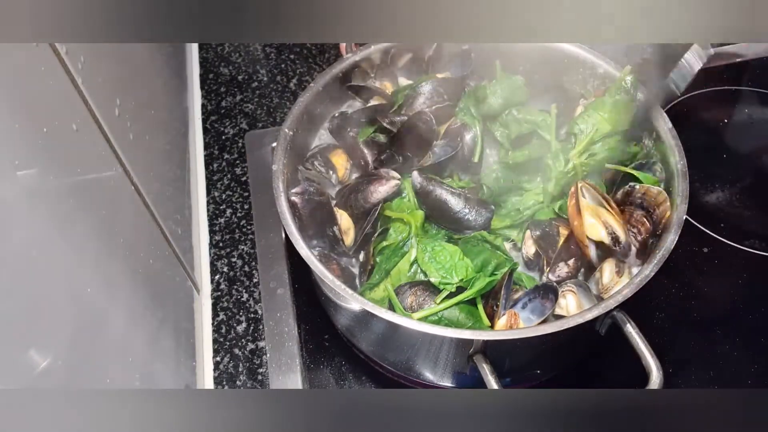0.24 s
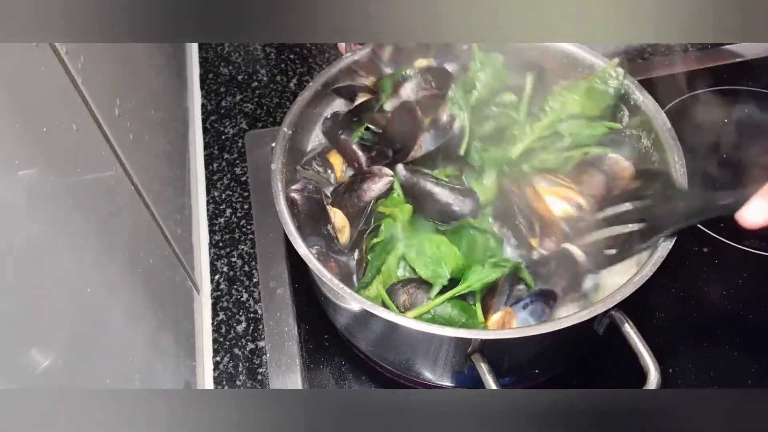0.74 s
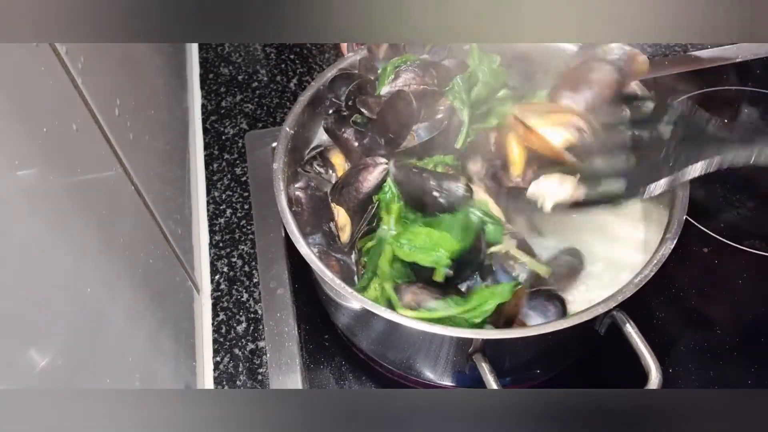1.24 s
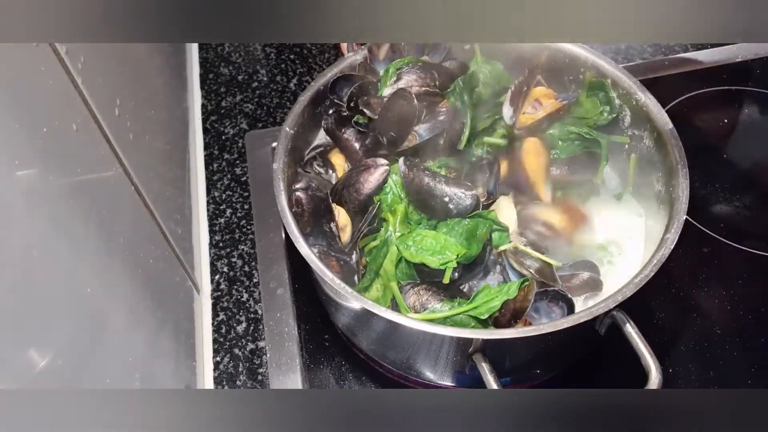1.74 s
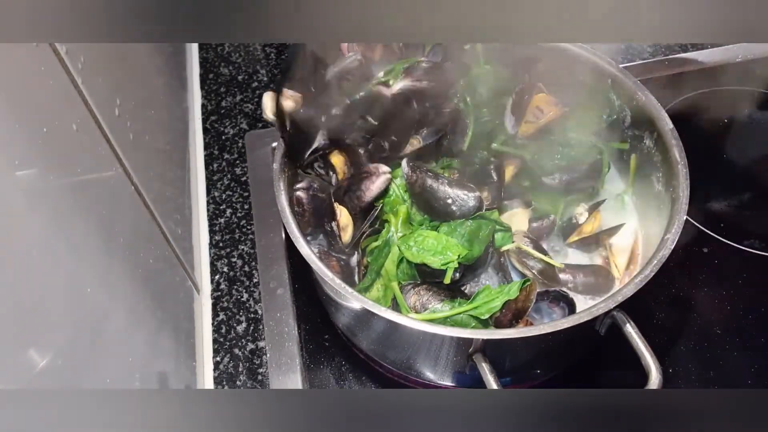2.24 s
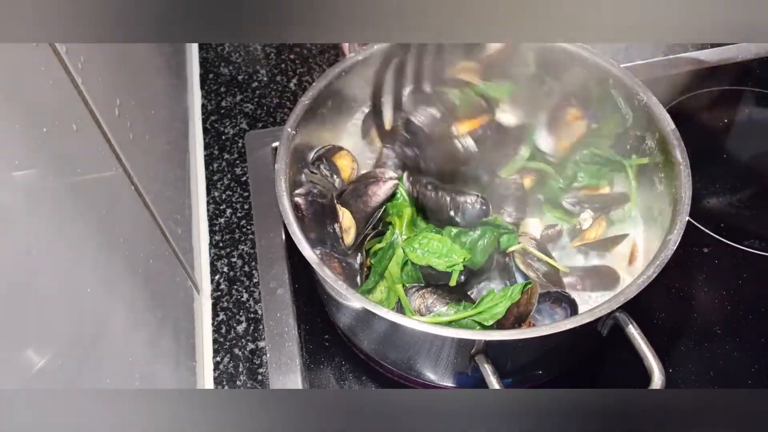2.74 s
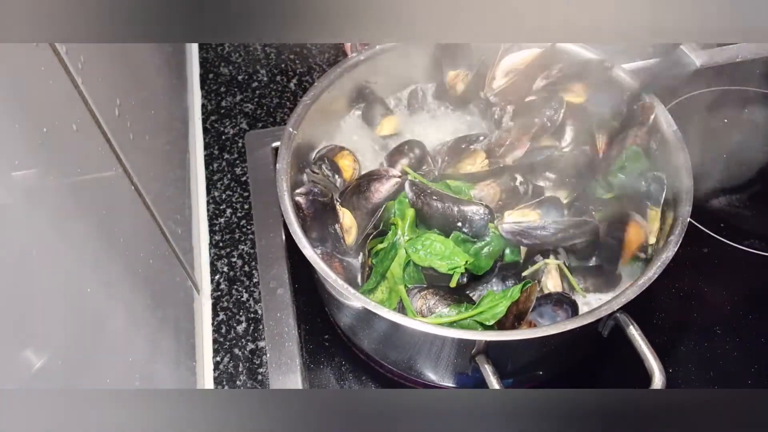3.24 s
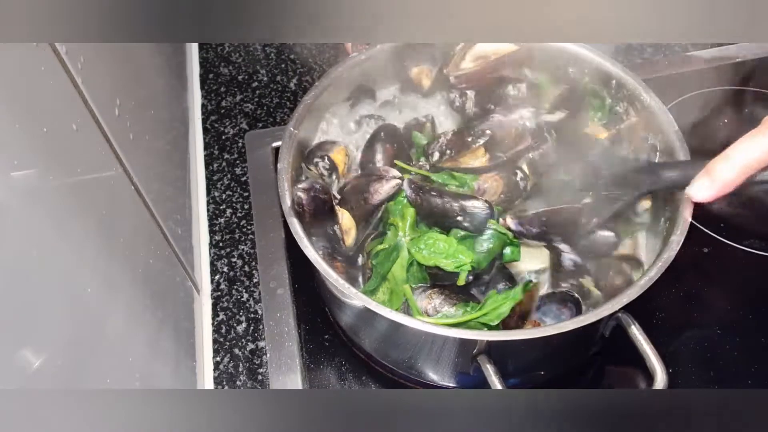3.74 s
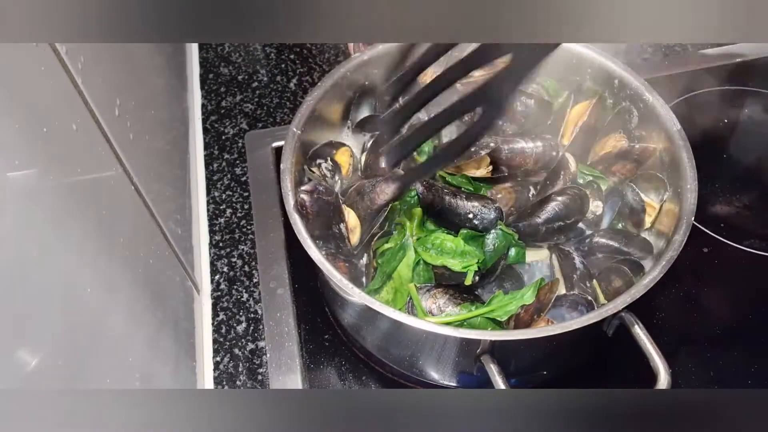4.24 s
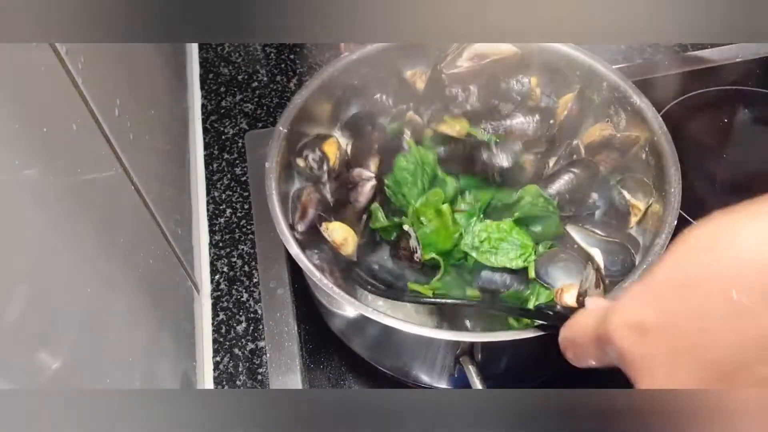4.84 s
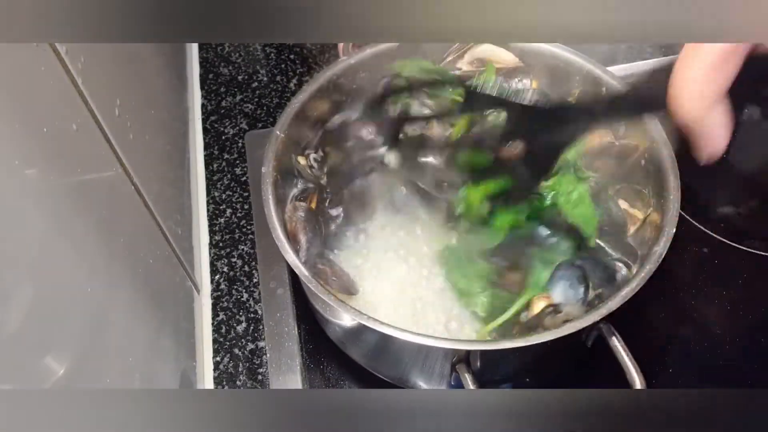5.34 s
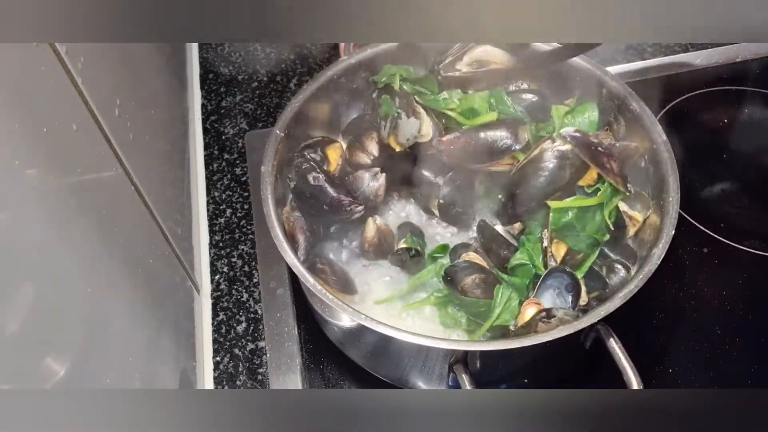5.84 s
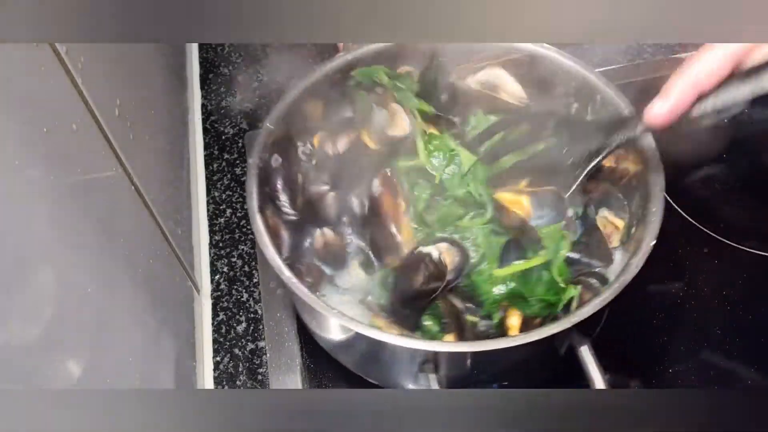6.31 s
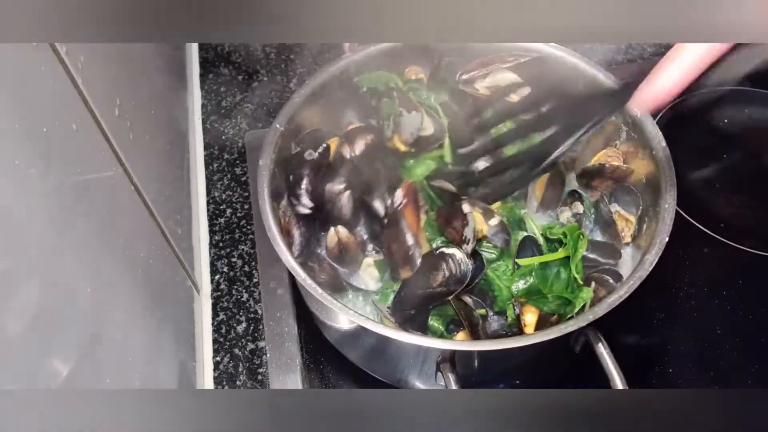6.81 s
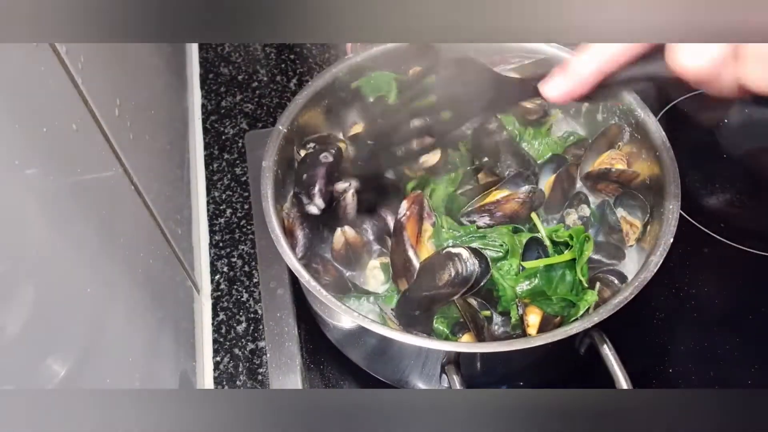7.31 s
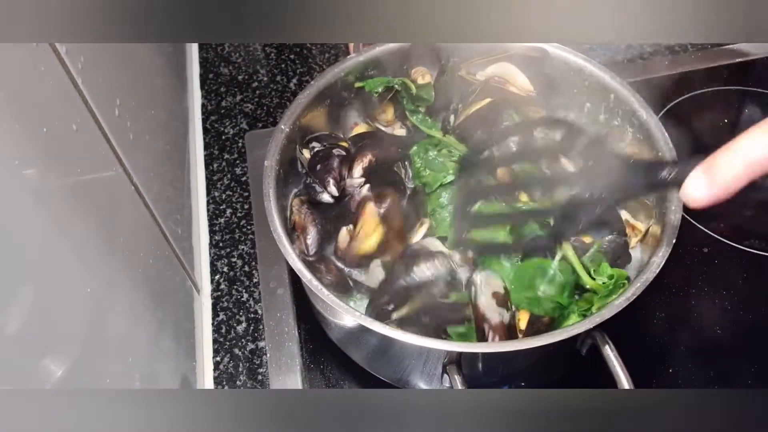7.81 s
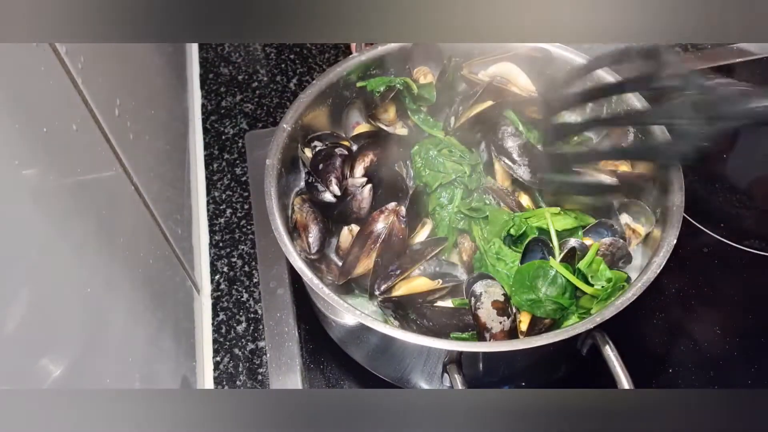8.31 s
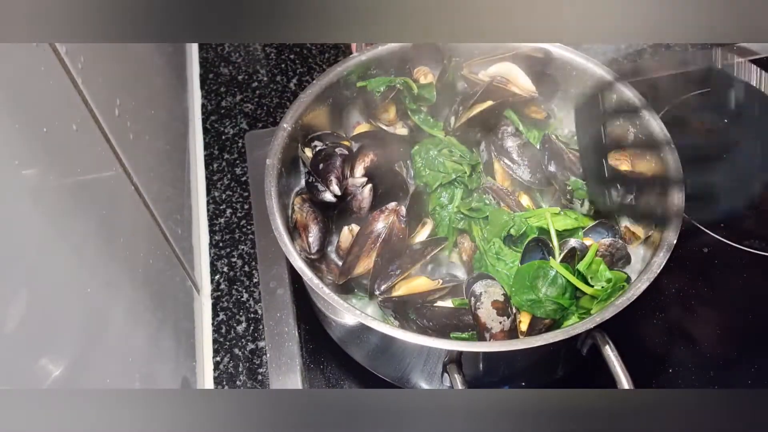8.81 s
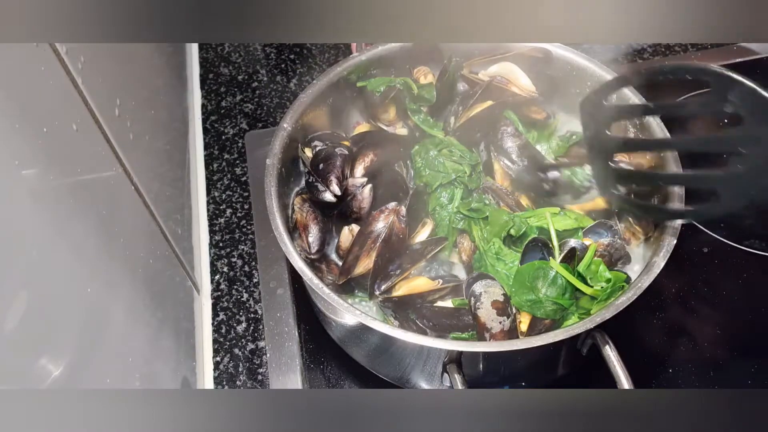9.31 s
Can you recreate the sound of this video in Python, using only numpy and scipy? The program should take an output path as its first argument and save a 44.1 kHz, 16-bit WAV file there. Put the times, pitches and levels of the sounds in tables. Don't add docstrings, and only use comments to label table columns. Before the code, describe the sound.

Close, irregular clatter of cooked mussel shells being turned in a steel pot, with small ticks, brief squeaks, low thuds and soft simmering.

```python
import sys
import numpy as np
from scipy import signal
from scipy.fft import rfft, irfft, next_fast_len
from scipy.io import wavfile
from scipy.ndimage import uniform_filter1d

SR = 44100
rng = np.random.default_rng(int(sys.argv[2]) if len(sys.argv) > 2 else 0)


def dump(signal):
    limited = np.clip(np.atleast_2d(signal).T, -1, 1)
    pcm = np.round(limited * 32767).astype(np.int16)
    wavfile.write(sys.argv[1], SR, pcm)


def ratio_of_db(decibels):
    return 10 ** (np.asarray(decibels, float) / 20)


N = 421596

# start_s, peak_db, pitch_hz, crack_db
BURIED_CLACKS = [(.3436, -44, 1630, -6), (.4329, -36, 2900, -10), (.4653, -35.5, 1910, -36),
                 (1.4172, -45, 1450, -15), (1.7744, -44.5, 2220, -40), (2.9622, -34.5, 7930, 2.5),
                 (3.0694, -37, 1790, -8.5), (3.1408, -43, 2180, -14), (3.2615, -40.5, 2910, -1),
                 (3.4352, -42, 3030, -35), (3.5533, -37.5, 3830, -13), (4.3765, -39, 1910, -9),
                 (4.4707, -26, 1660, 5.5), (4.7242, -43, 2130, -19), (4.817, -52, 1880, 1.5),
                 (4.8768, -41, 2320, -7), (5.0754, -36, 2000, -11), (5.3687, -38, 2060, -35),
                 (5.5972, -43, 1880, -12), (5.9264, -37, 2840, -6), (6.0797, -41.5, 2970, -7),
                 (6.5316, -35, 3080, -26), (7.3866, -34.5, 3100, -6), (7.642, -38.5, 1900, -12),
                 (7.7024, -41, 3560, -12), (7.7358, -34, 2000, -19), (7.7764, -29.5, 1900, -5),
                 (8.297, -44, 3000, -5.5), (8.3614, -29.5, 3340, -3.5), (9.3477, -44.5, 1660, -10)]
# start_s, peak_db, pitch_hz, crack_db
TOP_CLACKS = [(.0344, -40, 7400, -11), (1.2022, -38, 1730, -26), (1.5284, -40.5, 4430, -11),
              (1.6237, -43.5, 2710, -16), (1.7245, -48, 3030, -8), (2.2787, -36, 2120, -4.5),
              (2.6978, -33.5, 2260, -18), (2.7786, -38.5, 1720, -13), (2.9218, -38, 3130, -7),
              (3.3218, -32, 4270, -3.5), (3.6184, -36, 2740, -5.5), (4.0826, -44, 6560, -0.5),
              (4.3465, -35, 2240, -18), (4.506, -37, 5000, -5), (4.8464, -55, 6100, 4),
              (5.3243, -32.5, 2060, 1.5), (6.0287, -52, 2710, -1), (6.109, -30, 8200, -1),
              (6.7506, -49.5, 3100, -3), (7.447, -30.5, 3040, -9), (7.761, -27, 1970, -16),
              (7.7651, -24, 1910, -4), (7.89, -38, 1910, -15), (9.146, -44, 4360, -29),
              (9.225, -48.5, 3960, -6), (5.459, -43, 6100, 3)]
# start_s, peak_db, pitch_hz, crack_db
TUMBLING_CLACKS = [(.0094, -23.5, 2920, -14), (.6, -45.5, 1300, 1.5), (.6963, -37, 2920, -26),
                   (.9143, -31.5, 3520, -27), (1.2241, -37, 3950, -33), (1.2391, -28, 3900, -9.5),
                   (1.3339, -41, 3140, -10), (1.929, -36.5, 2735, -9.5), (2.4344, -34, 2170, -15),
                   (2.4965, -50.5, 1840, 6), (3.8566, -36.5, 2120, -26), (3.8921, -32, 2286, -35),
                   (4.737, -48, 3070, -5), (4.6254, -32.5, 2350, -42), (5.0494, -32, 2000, -14.5),
                   (5.2113, -42.5, 1580, -4), (5.469, -27.5, 3560, -16), (6.1294, -33, 1530, -19),
                   (6.342, -36, 1800, -20), (6.7725, -36, 3140, -54), (7.2055, -41, 2720, 5),
                   (7.411, -32.5, 1710, -8), (7.4774, -33.5, 2860, -37), (7.8186, -35, 1910, -8),
                   (7.8376, -32.5, 4150, -13), (8.549, -29, 2880, -13.5), (9.4499, -21, 3600, -22),
                   (9.4953, -29, 1540, -13.5)]
# start_s, peak_db, pitch_hz
TURNER_TAPS = [(0.361, -36.5, 4000), (0.5103, -34.5, 2380), (0.845, -52, 1800), (1.301, -37, 1520),
               (2.654, -36, 1460), (2.8924, -36, 1640), (3.009, -37, 1600), (3.0873, -32.5, 1590),
               (3.2976, -35.5, 1800), (3.3791, -30.5, 3740), (2.998, -41, 3550), (4.519, -28.5, 1570),
               (6.443, -41.5, 1560), (6.549, -41, 3070), (6.854, -36, 1955), (8.0602, -38.5, 3700),
               (8.3388, -36.5, 2460), (8.596, -43, 1410), (0.979, -47, 3250), (1.063, -42, 3060),
               (1.0976, -45, 3730), (1.159, -50, 3430), (1.184, -50, 3520), (5.181, -43.5, 2200),
               (6.2253, -48, 2800), (6.469, -47, 2980), (8.188, -44.5, 2730), (9.5574, -41, 1630)]
# pitch_factor, level_db
SHELL_MODES = [(.88, -8.5), (1.18, -9.5), (1.45, -40)]
# freq_hz, level_db
CRACK_COLOUR = [(2000, -29), (5500, 8), (8000, 9), (11500, 4), (16000, -7)]
# freq_hz, level_db
BODY_COLOUR = [(400, -4.5), (1500, 1.5), (3200, 4), (5200, -2.5), (11000, -36.5)]
# freq_hz, level_db
RATTLE_COLOUR = [(710, -49), (1250, -12), (1400, -1.5), (2590, -6.5), (3080, -2.5), (5650, -7.5),
                 (8170, -10), (16000, -23)]
# start_s, hold_s, rattle_db
HEAP_SHIFTS = [(0, 0.014, -42), (.345, 0.15, -47.5), (.58, 0.21, -50), (.85, 0.029, -44.5),
               (1.16, 0.12, -51.5), (2.25, 0.067, -50), (2.43, 0.045, -48.5), (2.64, 0.078, -48.5),
               (2.96, 0.22, -53.5), (3.32, 0.29, -48), (3.85, 0.093, -58), (4.345, 0.032, -50.5),
               (4.472, 0.059, -45), (4.56, 0.088, -49.5), (4.877, 0.023, -50), (5.14, 0.24, -57),
               (6.94, 0.15, -59), (6.02, 0.05, -45), (6.11, 0.038, -36.5), (6.42, 0.14, -54),
               (6.82, 0.039, -50), (7.212, 0.0087, -41), (7.33, 0.12, -46.5), (7.7, 0.077, -42.5),
               (8.06, 0.12, -56), (8.34, 0.036, -49), (9.15, 0.24, -58), (9.45, 0.076, -53.5)]
# start_s, peak_db, pitch_hz,
# t60_s
EDGE_PINGS = [(.359, -33.5, 2450, 0.056), (.3911, -46, 1830, .04), (.403, -47, 3980, 0.044),
              (.4325, -42, 2740, .03), (.4655, -40, 4070, .02), (.5094, -41, 2100, 0.11),
              (.5095, -39, 3800, 0.015), (.5917, -48, 3500, .03), (.7842, -45, 3760, .03),
              (.8346, -45, 3100, .015), (.8461, -42, 3330, .015), (.8626, -43, 2320, 0.02),
              (.9144, -34, 4000, 0.0098), (1.3339, -36.5, 3120, 0.027), (3.2978, -31, 2900, 0.0067),
              (3.352, -43, 4500, .03), (3.388, -40, 3970, 0.027), (3.4186, -46, 3600, .02),
              (3.636, -39, 3050, .02), (3.598, -42, 3170, 0.033), (3.7254, -48, 1820, .03),
              (4.4665, -28, 2020, 0.02), (4.473, -29.5, 1410, 0.043), (4.4725, -22, 4820, 0.025),
              (4.5175, -41, 3000, .012), (4.568, -21.5, 1630, 0.012), (4.5947, -48, 3600, .04),
              (5.9262, -36.5, 3050, 0.032), (5.9606, -42, 2520, 0.056), (5.9985, -43, 4490, 0.015),
              (6.0289, -45, 3430, 0.028), (6.0484, -45, 2850, .05), (6.061, -41, 4000, .03),
              (6.1656, -33.5, 3000, 0.021), (6.2255, -45.5, 4320, .015), (6.3023, -45, 1470, 0.034),
              (6.329, -44, 1900, .02), (6.3816, -48, 1920, 0.036), (6.5238, -52, 5600, 0.044),
              (6.572, -44, 3120, .04), (6.8072, -45.5, 1450, .05), (6.826, -50, 3020, .04),
              (6.882, -45, 2030, .03), (6.948, -50, 3300, .012), (6.985, -41, 1460, 0.056),
              (7.02, -58, 3120, 0.03), (7.2142, -38, 2240, 0.034), (7.324, -51, 1940, .03),
              (7.4771, -43, 2900, .06), (7.5265, -47, 3600, .02)]
# start_s, peak_db, pitch_hz
THIN_TICKS = [(1.0304, -51, 4500), (1.1315, -49, 2000), (1.16, -44, 4170), (1.1854, -55, 4800),
              (1.2028, -48, 6000), (1.254, -36, 4400), (1.3041, -52, 4000), (1.4175, -48, 5360),
              (1.4598, -52, 3660), (1.7002, -58, 6500), (1.774, -42, 3670), (1.792, -45, 3600),
              (1.82, -47, 1280), (2.023, -45.5, 1830), (2.196, -48, 5970), (2.254, -44, 5500),
              (2.319, -45, 5800), (2.3934, -44.5, 5100), (2.4732, -40, 1830), (2.6251, -50, 6000),
              (2.6815, -61, 6500), (2.715, -38, 9100), (2.9617, -31, 3600), (3.0707, -38, 3500),
              (3.03, -50, 5200), (3.1639, -37.5, 6400), (3.8921, -38, 2310), (4.084, -34.5, 5600),
              (4.597, -48, 6000), (5.162, -45, 4070), (5.227, -41, 3020), (5.2696, -50, 9000),
              (5.2884, -45, 4170), (5.306, -47, 4520), (5.378, -43, 4500), (5.4113, -48, 5760),
              (5.4348, -45, 3200), (7.712, -33, 3500), (7.933, -45.5, 2670), (8.135, -46, 3140),
              (8.1889, -50, 5300), (8.339, -41, 3870), (9.4505, -29, 3710), (3.96, -50, 4970),
              (4.036, -47, 3760), (6.693, -50, 3010), (.4695, -37, 1500), (3.0687, -51, 1710),
              (2.4345, -43, 1890), (5.327, -40, 5100)]
# start_s, hold_s, level_db
SHELL_SCRAPES = [
    (.37, 0.084, -50),
    (.6, 0.09, -73),
    (3.432, 0.013, -46),
    (3.48, .02, -53),
    (3.535, 0.022, -54),
    (3.575, .04, -65),
    (6.13, 0.038, -58),
    (7.39, 0.065, -49.5),
]
# freq_hz, width_hz, level_db
SQUEAL_MODES = [(2450, 71, -0.5), (3144, 25, 0), (3560, 160, -6)]
# start_s, peak_db, pitch_hz, plate_share_db
POT_KNOCKS = [(0.013, -31, 497, -1), (0.3425, -33.5, 930, 7.5), (.397, -38.5, 580, -24),
              (0.4679, -35, 970, 0), (0.688, -41.5, 1070, 13), (1.871, -41, 760, -3), (2.194, -40, 620, 3),
              (2.438, -42, 500, 7), (3.085, -46.5, 1090, -8), (3.298, -38.5, 1250, -8),
              (3.375, -48, 1340, 19), (3.435, -41, 670, 22), (3.621, -38.5, 645, 22.5),
              (3.776, -42.5, 614, -16), (4.346, -38, 1470, -12), (4.472, -19, 816, -4),
              (4.5671, -32, 1430, -26), (4.623, -27.5, 557, 12.5), (4.712, -40, 620, 15),
              (5.05, -48.5, 560, -18), (5.35, -48, 1090, -16), (6.061, -39.5, 1070, -25),
              (6.534, -42.5, 1190, -26), (7.759, -40, 1070, 1), (8.362, -44.5, 428, 10),
              (9.496, -33, 676, -4)]
# freq_hz, width_hz, level_db
POT_MODES = [(342, 13, -8.5), (428, 16, -2), (555.7, 31.5, 4.5), (699, 75, 1.5), (890, 15, -9),
             (1066.6, 45, 4.5), (1305, 12, -4.5), (1363, 34, -6.5), (1630, 130, -11.5), (1910, 110, -4.5),
             (2170, 86, -22), (2460, 33, -16), (2920, 57, -7), (3600, 520, -6.5)]
# start_s, peak_db, pitch_hz, t60_s
POT_THUDS = [(0, -40, 235, 0.23), (.6, -47, 249, .3), (3.54, -35, 71, 0.44), (3.6, -39, 144, 0.24),
             (4.635, -25, 118, 0.59), (4.64, -34, 72.5, 0.65), (5.92, -55, 68, .5),
             (7.74, -38.5, 72.3, 0.96), (8.54, -59, 302, 0.14), (9.2, -57, 204, 0.5),
             (9.49, -33.5, 210, 0.19), (.76, -37, 117, 0.54), (2.42, -40, 122, 0.49),
             (3.68, -38, 140.4, 0.36), (1.0, -43.5, 59.6, .5)]
# start_s, hold_s, force_db
PLATE_PUSHES = [(.35, 0.11, -44), (.466, 0.015, -33.5), (.56, 0.24, -43.5), (.765, 0.0071, -38.5),
                (.86, 0.06, -40), (9.0, 0.32, -56.5), (1.93, 0.012, -46), (2.2, 0.41, -49.5),
                (2.42, 0.049, -40.5), (2.55, 0.41, -51), (3.385, 0.2, -36.5), (3.62, 0.0093, -32),
                (3.72, 0.16, -46), (4.35, 0.04, -52), (4.475, 0.056, -34), (4.7, 0.028, -37),
                (4.86, 0.035, -51.5), (5.32, 0.026, -48.5), (6.02, 0.17, -41), (6.32, 0.037, -40.5),
                (6.53, 0.14, -59), (6.82, 0.12, -48.5), (7.24, 0.018, -46), (7.38, 0.086, -45.5),
                (7.7, 0.13, -52), (8.34, 0.051, -62), (9.45, 0.063, -45.5)]
# freq_hz, width_hz, level_db
PLATE_MODES = [(49, 18, -4), (73.3, 4, -4), (98, 18, -3), (120.8, 9.3, -1), (202, 26.6, -5.5),
               (261, 22.5, -8)]
# freq_hz, level_db
HISS_COLOUR = [(18, -40), (40, -43), (221, 8.5), (400, -14.5), (1100, -37), (2980, -23), (11700, -26),
               (16000, -37)]
# freq_hz, share
MIC_LIKENESS = [(60, 0.66), (180, 1), (550, 0.66), (1650, 0.71), (4970, 0.085), (15000, 0.02)]
# freq_hz, t60_s
KITCHEN_DECAY = [(400, 0.18), (4000, 0.12), (14000, 0.13)]

LEAD_S = 0.02
BURIED_DB, TOP_DB, TUMBLING_DB, TAP_BODY_DB = -4, -9, -16.5, -9.5
TAP_CRACK_DB = -31
SIMMER_DB, DRAG_DB, DRAG_SHARE = -57, -21.5, 0.56
TICK_TURNS, TICK_GRIT = 36, 1.3
HISS_DB = -58.5
TREBLE_TOP_HZ = 15900


def clack(peak_db, hz, crack_db, body_db):
    t = np.arange(3072) / SR - LEAD_S
    after = np.maximum(t, 0)
    noise = rng.standard_normal((3, len(t)))
    phases = rng.random((len(SHELL_MODES) + 1, 2, 1))
    lag = rng.integers(-7, 8)
    pair = np.array([noise[0], 0.82 * np.roll(noise[0], lag) + 0.45 * noise[1]])

    slide = ratio_of_db(-11.5) * np.exp(np.minimum(t / 0.0055, -t / 0.0065))
    late = ratio_of_db(-300 * after) / (1 + np.exp((t - 0.006) / 0.002))
    early = ratio_of_db(-1.0 - 60 * after / 0.053)
    echoes = np.clip(t / 0.0015, 0, 1) ** 2 * (late + early) + slide
    snap = 2.2 * np.clip(t / 0.00029, 0, 1) * np.exp(-after / 0.0014)
    bright = ratio_of_db(crack_db - 4.0) * evened(colour(pair, CRACK_COLOUR))
    crack = bright + ratio_of_db(body_db) * evened(colour(pair, BODY_COLOUR))

    hump = [(hz / 2, -40), (hz / 1.17, -10), (hz, 0), (hz * 1.12, -10), (hz * 2, -40)]
    scatter = 0.17 * evened(colour(pair, hump)) * echoes

    ring_s = 0.03
    modes = sum(ratio_of_db(db - 60 * after / ring_s) * np.sin(2 * np.pi * (hz * ratio * t + phase / 2))
                for (ratio, db), phase in zip([(0.99, 0), *SHELL_MODES], phases))
    chatter = 1 + 0.4 * evened(colour(noise[2], [(120, 7), (400, -53)]))
    ping = np.clip(t / 0.0003, 0, 1) ** 2 * modes * chatter

    sound = crack * (echoes + snap) + scatter + ping
    return ratio_of_db(peak_db - 4.5) * sound * signal.windows.tukey(len(t), 0.2)


def shells():
    out = np.zeros((2, N + SR))
    taps = [(*row, TAP_CRACK_DB) for row in TURNER_TAPS]
    kinds = ((BURIED_CLACKS, BURIED_DB), (TOP_CLACKS, TOP_DB), (TUMBLING_CLACKS, TUMBLING_DB), (taps, TAP_BODY_DB))
    for rows, body_db in kinds:
        for start_s, *row in rows:
            add(out, start_s, clack(*row, body_db))
    return out[:, round(LEAD_S * SR):][:, :N] * pan(0.8)


def heap_shift():
    return strokes(HEAP_SHIFTS, rest_db=-62, rise_db_s=562, fall_db_s=225)


def rattle():
    t = np.arange(900) / SR
    out = np.zeros((2, N))
    grit, grain_s = 1.2, 0.015
    for hz in np.geomspace(1500, 4600, 14):
        clumps = ratio_of_db(3.7 * evened(uniform_filter1d(rng.standard_normal(N), 700)))
        tone = np.sin(2 * np.pi * (hz * t + rng.random((2, 1))))
        tone = tone * np.minimum(t / 0.0017, 1) * 2000 / hz
        noise = grit * rng.standard_normal((2, len(t))) / 2
        grain = (tone + noise) * ratio_of_db(-60 * t / grain_s)
        hits = clumps * clicks(130, 3.9)
        out += signal.oaconvolve(hits[None], grain, axes=1)[:, :N]
    return ratio_of_db(-3.0) * heap_shift() * evened(colour(out, RATTLE_COLOUR))


def struck(rows, rise_turns, blur, rough, size):
    out = np.zeros((2, N))
    chatter = evened(uniform_filter1d(rng.standard_normal((len(rows), 2, SR // 8)), size))
    offsets = rng.uniform(-1.25, 1, (len(rows), 2))
    for (start_s, db, hz, t60), (turn, twin), wet in zip(rows, offsets, chatter):
        t = np.arange(round(t60 * SR)) / SR
        phase = blur * turn * np.array([[1], [-1]])
        tone = np.sin(2 * np.pi * hz * t + phase)
        tone = tone + 0.32 * np.sin(2 * np.pi * hz * (1 + 0.081 * twin) * t - phase)
        tone = tone * (1 + rough * np.array([np.resize(w, len(t)) for w in wet]))
        add(out, start_s, ratio_of_db(db - 60 * t / t60) * np.minimum(t * hz / rise_turns, 1) * tone)
    return out


def pings_and_ticks():
    ticks = [(*row, TICK_TURNS / row[2]) for row in THIN_TICKS]
    pings = struck(EDGE_PINGS, 0.66, 0.65, 0.33, size=45)
    return (pings + struck(ticks, 0.49, 1.14, TICK_GRIT, size=7)) * pan(0.8)


def scrape():
    left, other = (evened(ring(clicks(900, 1.5), SQUEAL_MODES)) for _ in range(2))
    gain = strokes(SHELL_SCRAPES, rest_db=-80, rise_db_s=900, fall_db_s=500)
    return gain * np.array([left, 0.49 * left + 0.62 * other])


def knocks():
    pot, push = np.zeros(N), np.zeros(N)
    t = np.arange(4000) / SR
    for start_s, db, hz, plate_db in POT_KNOCKS:
        near = 0
        for k, (mode_hz, width, mode_db) in enumerate(POT_MODES):
            gain = (-1) ** k * ratio_of_db(mode_db / 2 - 57.5 * abs(np.log2(mode_hz / hz)))
            decay = np.exp(-np.pi * (0.41 * width + 22) * t)
            near = near + gain * decay * np.sin(2 * np.pi * mode_hz * t)
        thump_colour = [(150, -30), (hz / 3.2, 0), (hz * 2.2, -6), (hz * 4, -30)]
        thump = evened(colour(rng.standard_normal(len(t)), thump_colour)) * ratio_of_db(-60 * t / 0.083)
        add(pot, start_s, ratio_of_db(db + 8.5) * (near + 0.29 * thump) * np.minimum(t * hz / 2.4, 1))
        add(push, start_s, ratio_of_db(db + plate_db - 62) * np.hanning(230))
    return np.array([pot, np.roll(pot, 8)]) * pan(0.6), ring(push, PLATE_MODES, 1)


def thuds():
    return struck(POT_THUDS, 0.97, 0.1, 0, size=9)


def plate_push():
    return strokes(PLATE_PUSHES, rest_db=-57, rise_db_s=458, fall_db_s=265)


def plate_rumble():
    force = plate_push()
    jolts = [clicks(700, 1.24) for _ in range(2)]
    shake, other = (ring(force * j, PLATE_MODES) / np.std(ring(j, PLATE_MODES)) for j in jolts)
    return ratio_of_db(-1.0) * (shake + 0.082 * other * np.array([[1], [-1]]))


def drag_on_pot():
    push = plate_push()
    drag = ratio_of_db(DRAG_DB) * (ratio_of_db(-5) * push) ** DRAG_SHARE * np.tanh(push / ratio_of_db(-65))
    return np.hypot(ratio_of_db(SIMMER_DB), drag + ratio_of_db(-6.0) * heap_shift())


def bubbles():
    t, out = np.arange(1500) / SR, np.zeros(N)
    for hz in np.geomspace(350, 2600, 11):
        note = np.sin(2 * np.pi * hz * t * (1 + 3 * t))
        note = note * np.exp(-t * hz / 18.5) * np.minimum(t * hz / 2, 1)
        out += signal.oaconvolve(clicks(25, 5.0), note)[:N]
    return evened(out)


def pot_hum():
    sides = []
    for _ in range(2):
        blunt_taps = np.convolve(clicks(1300, 5.37), np.hanning(9), "same")
        sides.append(evened(ring(blunt_taps, POT_MODES)) + 0.5 * bubbles())
    return ratio_of_db(-2.5) * drag_on_pot() * spread(*sides)


def hiss():
    frames = N // 256 + 5
    a, b, c, d, patches = rng.standard_normal((frames, 513, 5)).T
    patches = evened(uniform_filter1d(uniform_filter1d(patches, 12, 0), 12, 1))
    spectra = np.array([a + 1j * b, c + 1j * d]) * ratio_of_db(2.1 * patches)
    left, other = signal.istft(spectra, nperseg=1024, noverlap=768)[1][:, :N]
    return ratio_of_db(HISS_DB) * evened(colour(spread(left, other), HISS_COLOUR))


def kitchen(x):
    taps = np.zeros((2, SR // 2))
    at = np.arange(100, SR // 2 - 20, 20)
    at = at + rng.integers(0, 20, (2, len(at)))
    np.put_along_axis(taps, at, rng.choice([-1., 1.], at.shape), 1)
    hz, t, z = signal.stft(taps, SR, nperseg=256)
    decay = ratio_of_db(-60 * t / read(KITCHEN_DECAY, hz)[:, None])
    tail = signal.istft(z * decay, SR, nperseg=256)[1]
    return signal.fftconvolve(x, tail / np.linalg.norm(tail[0]), axes=1)[:, :N]


def strokes(rows, rest_db, rise_db_s, fall_db_s):
    t = np.arange(0, N + 64, 64) / SR
    start, hold, db = np.transpose(rows)[:, :, None]
    rise = rise_db_s * np.maximum(start - t, 0)
    fall = fall_db_s * np.maximum(t - start - hold, 0)
    each = ratio_of_db(db - rise - fall)
    return np.interp(np.arange(N) / SR, t, np.sqrt(ratio_of_db(rest_db) ** 2 + (each ** 2).sum(0)))


def clicks(per_s, spread_db):
    where, size, sign = rng.random((round(per_s * N / SR), 3)).T
    out = np.zeros(N)
    level = ratio_of_db(spread_db * np.minimum(-np.log(1 - size), 4))
    out[(where * N).astype(int)] = level * np.sign(sign - 0.5)
    return out


def ring(x, modes, flip=-1):
    t = np.arange(SR // 2) / SR
    body = 0
    for k, (hz, width, db) in enumerate(modes):
        gain = flip ** k * ratio_of_db(db) * np.sqrt(width)
        body = body + gain * np.exp(-np.pi * width * t) * np.sin(2 * np.pi * hz * t)
    return signal.oaconvolve(x, body)[:N]


def colour(x, points):
    size = next_fast_len(x.shape[-1])
    gain = ratio_of_db(read(points, np.fft.rfftfreq(size, 1 / SR)))
    return irfft(rfft(x, size) * gain, size)[..., :x.shape[-1]]


def spread(left, other):
    size = next_fast_len(N)
    same = np.clip(read(MIC_LIKENESS, np.fft.rfftfreq(size, 1 / SR)), 0, 1)
    right = same * rfft(left, size) + np.sqrt(1 - same ** 2) * rfft(other, size)
    return np.array([left, irfft(right, size)[:N]])


def pan(left_db):
    return ratio_of_db(np.array([[left_db], [-left_db]]))


def evened(x):
    return x / np.sqrt(np.mean(x ** 2) + 1e-20)


def read(points, hz):
    f, value = np.transpose(points)
    return np.interp(np.log(hz + 1), np.log(f + 1), value)


def add(mix, start_s, sound):
    part = mix[..., round(start_s * SR):][..., :sound.shape[-1]]
    part += sound[..., :part.shape[-1]]


def scene():
    pot, plate = knocks()
    contacts = shells() + rattle() + pings_and_ticks() + scrape() + pot
    steady = plate_rumble() + pot_hum() + hiss()
    return contacts + ratio_of_db(-8) * kitchen(contacts) + plate + thuds() + steady


def low_pass(x):
    return signal.sosfilt(signal.butter(12, 16300, fs=SR, output="sos"), x)


def record(dry):
    bass_cut = signal.butter(4, 44, "highpass", fs=SR, output="sos")
    top_cut = signal.firwin(255, TREBLE_TOP_HZ, window=("kaiser", 9), fs=SR)
    mix = signal.oaconvolve(signal.sosfilt(bass_cut, dry), top_cut[None], "same")
    return low_pass(mix)


dry = scene()
out = record(dry)
dump(out)
```